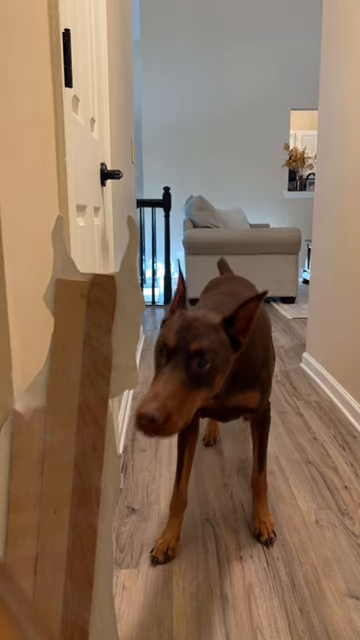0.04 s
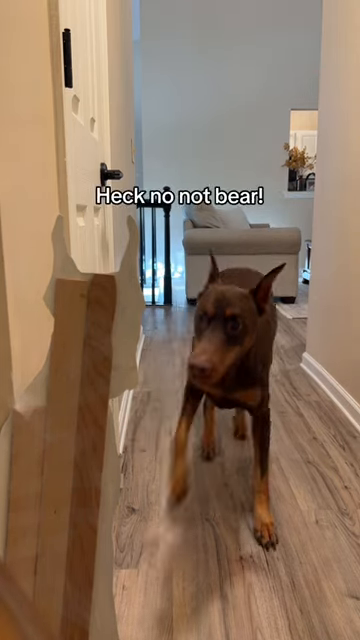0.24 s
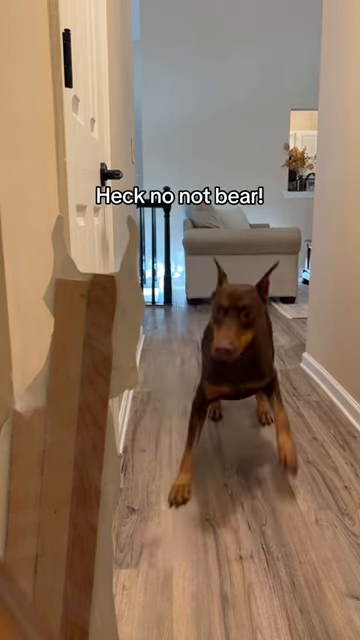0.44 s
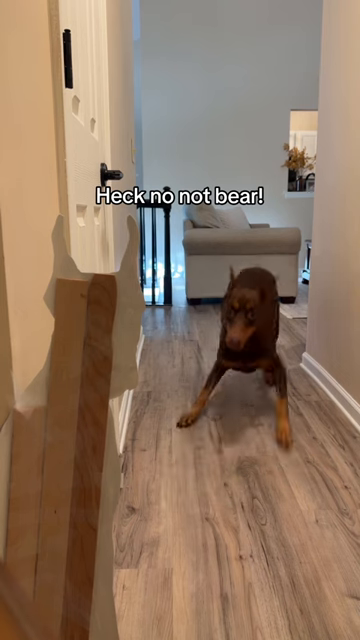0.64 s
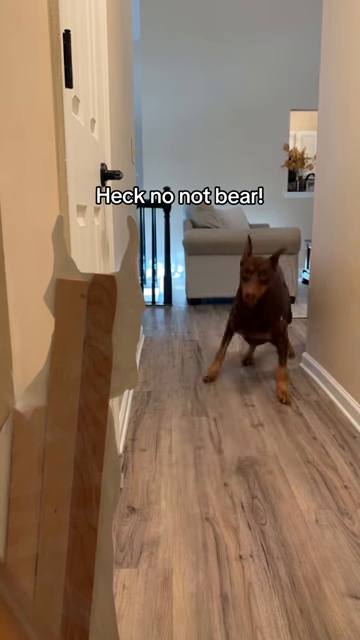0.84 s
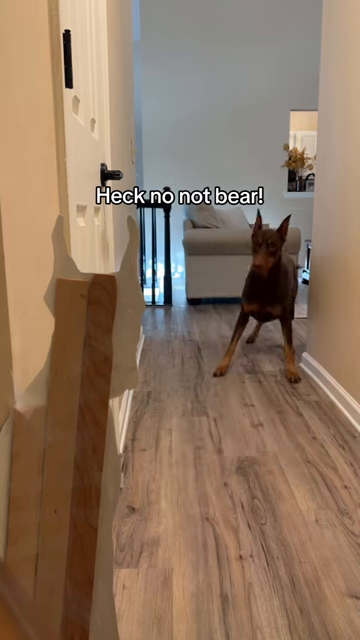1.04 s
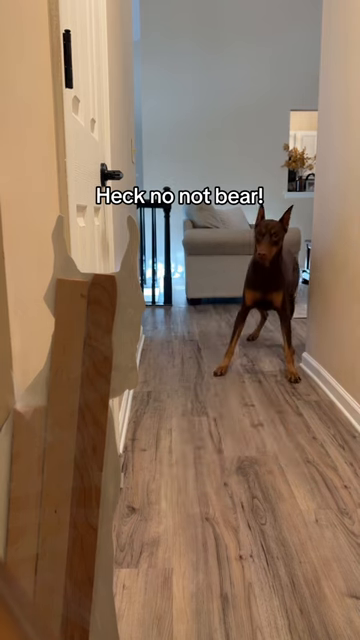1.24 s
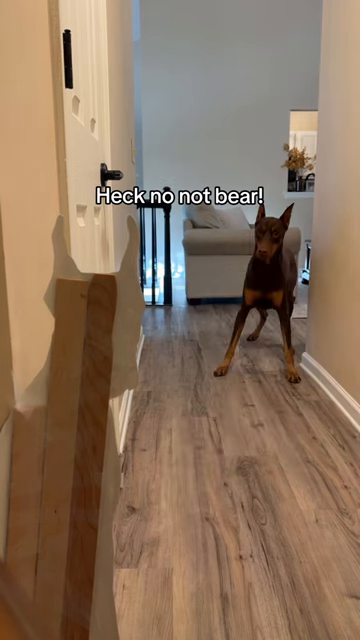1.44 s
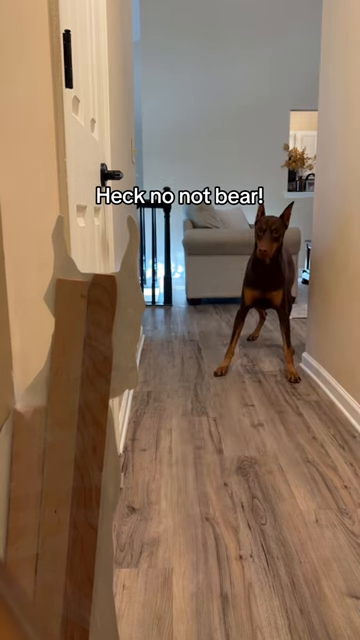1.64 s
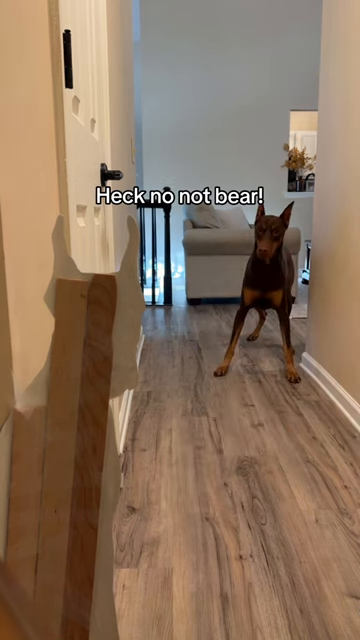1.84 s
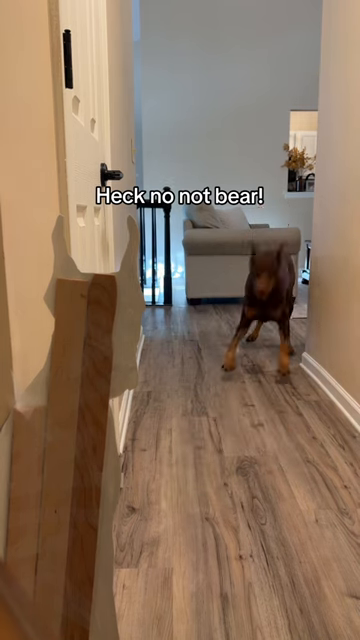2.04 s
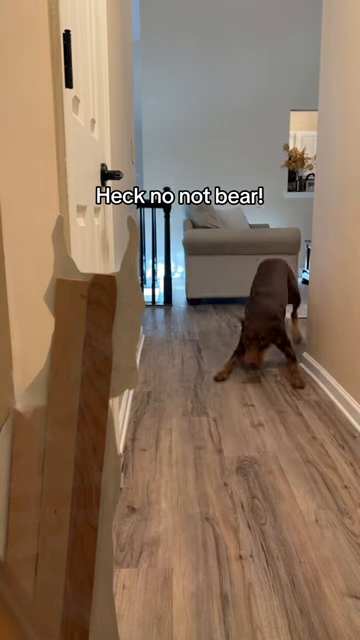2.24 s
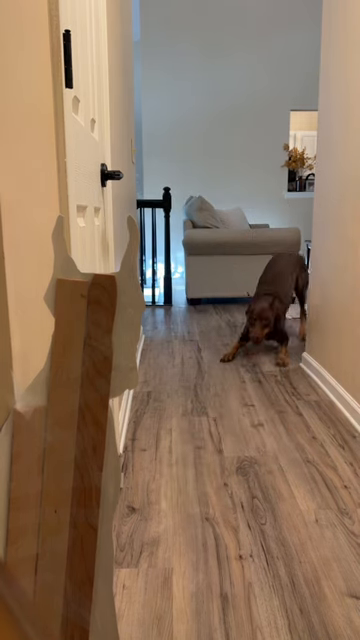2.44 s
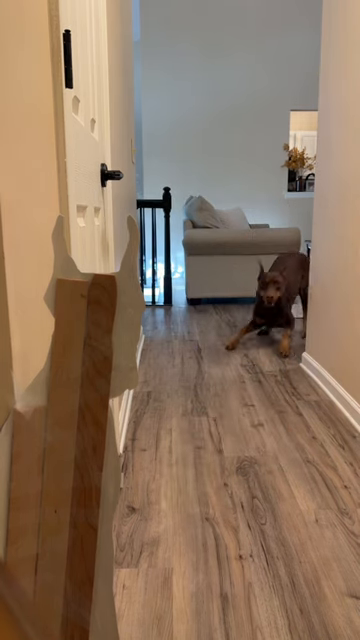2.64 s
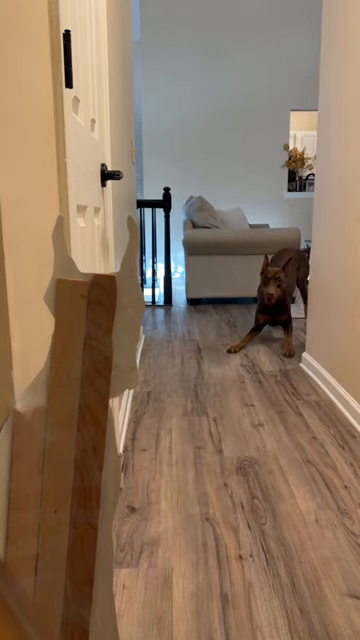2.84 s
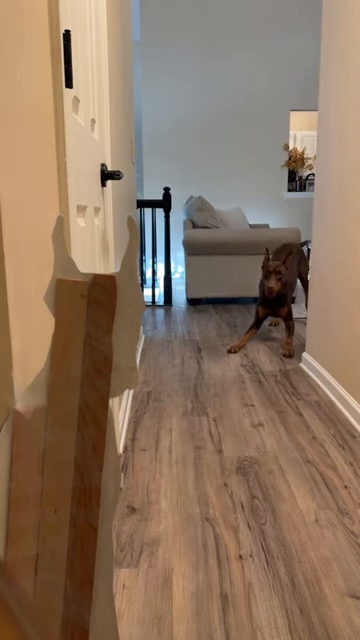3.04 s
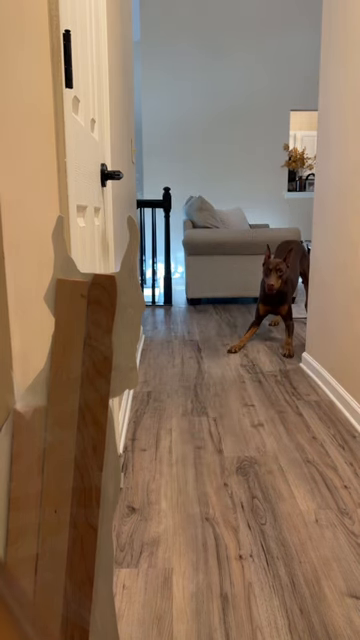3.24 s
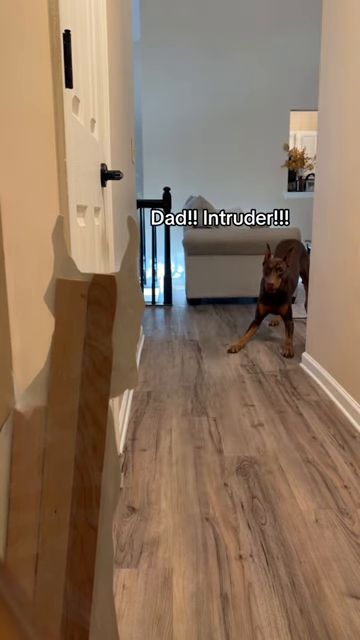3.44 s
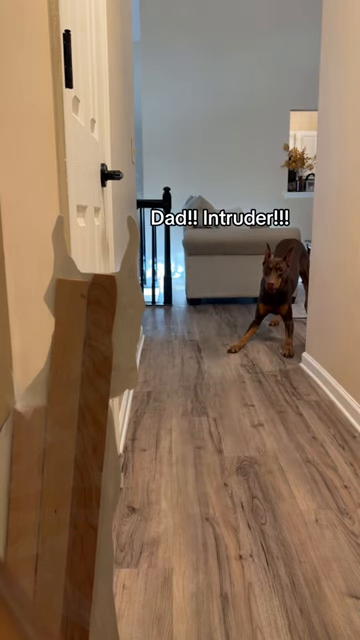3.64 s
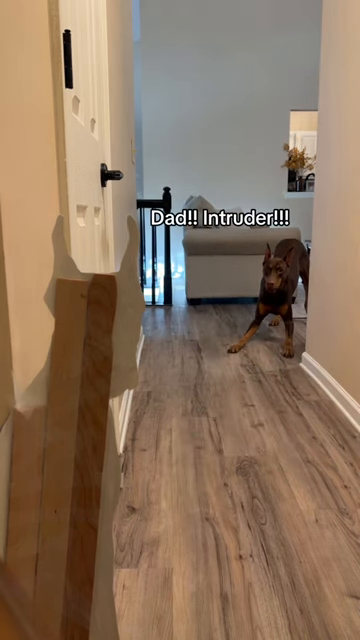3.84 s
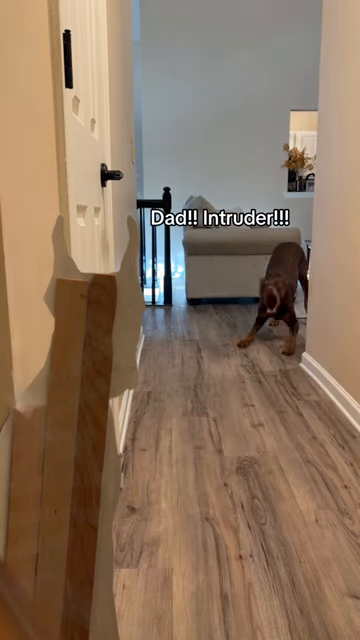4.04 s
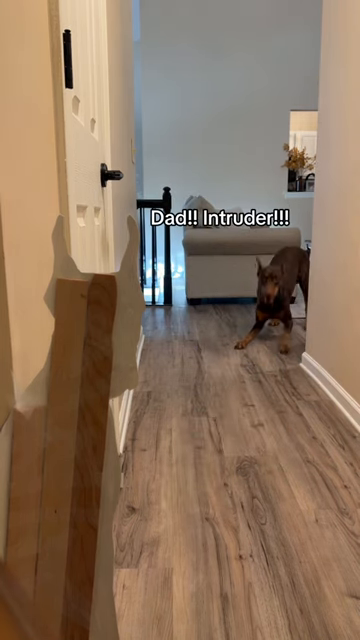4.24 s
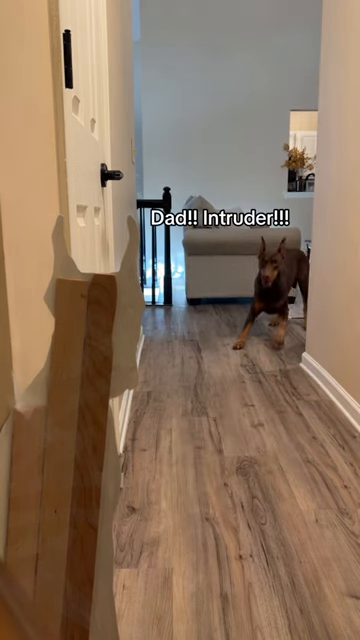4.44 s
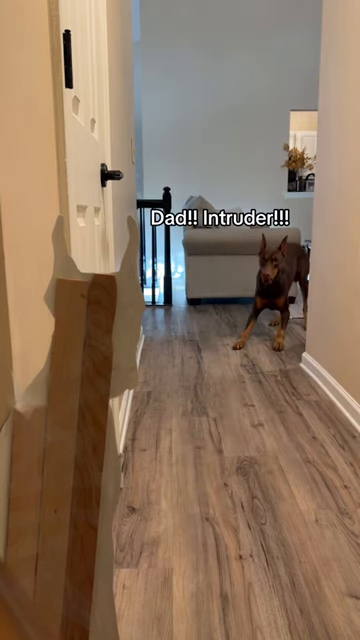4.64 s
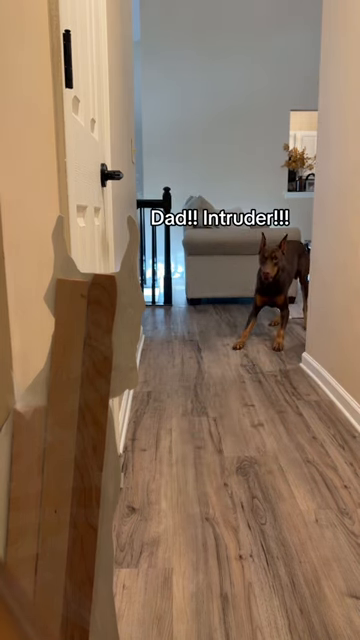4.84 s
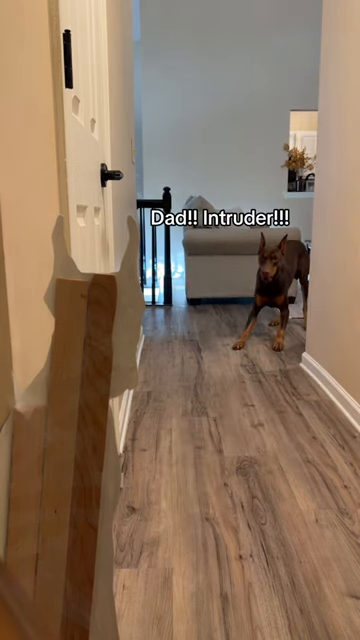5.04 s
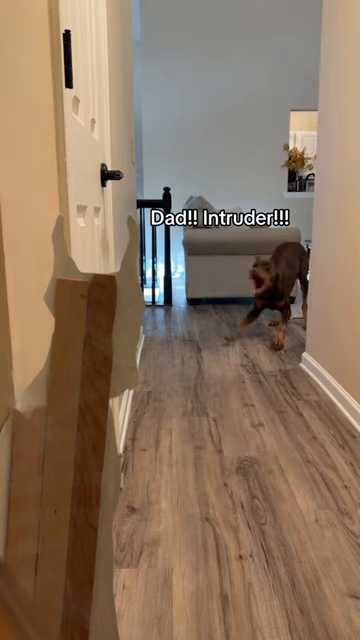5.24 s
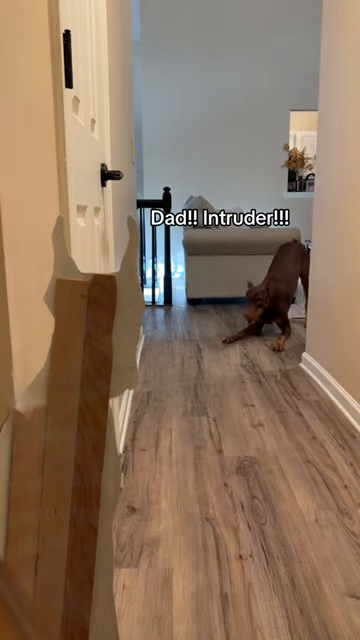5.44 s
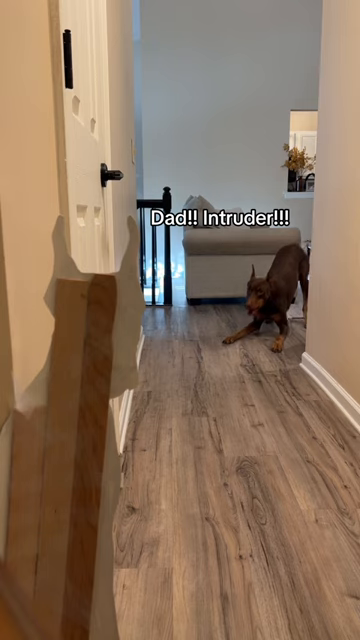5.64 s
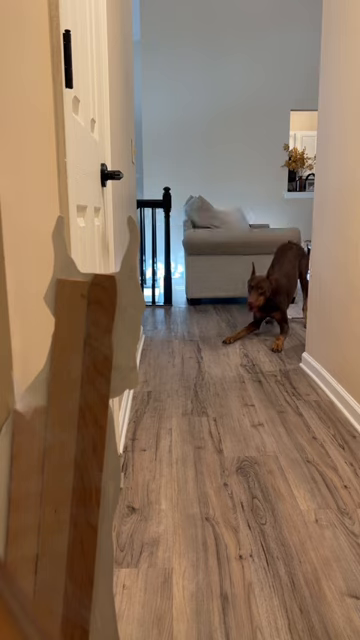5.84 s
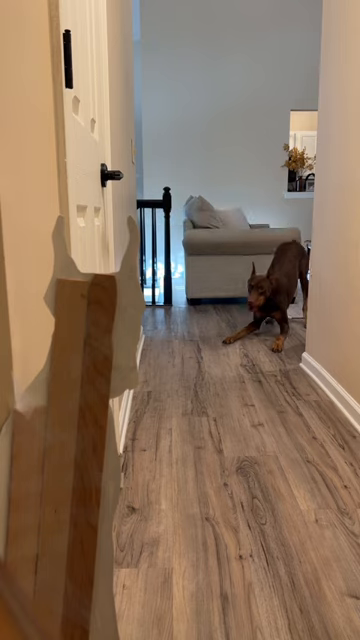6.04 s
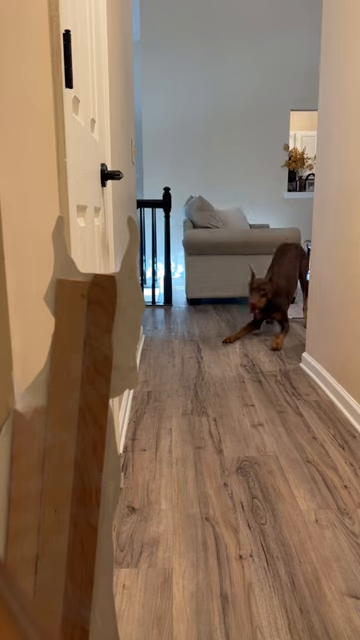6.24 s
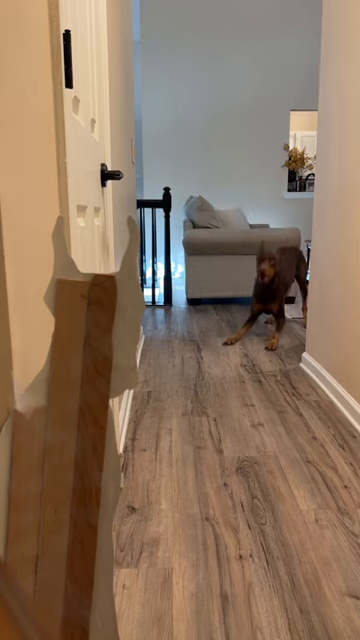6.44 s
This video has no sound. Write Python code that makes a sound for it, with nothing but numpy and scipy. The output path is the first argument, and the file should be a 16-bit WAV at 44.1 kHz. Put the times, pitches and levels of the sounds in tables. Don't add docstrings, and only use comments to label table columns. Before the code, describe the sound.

Noisy claw clatter and paw thumps on laminate give way to four single hoarse-to-high dog barks echoing down a home hallway.

```python
import sys
import numpy as np
from scipy import signal
from scipy.fft import rfft, irfft, next_fast_len
from scipy.io import wavfile
from scipy.ndimage import uniform_filter1d, map_coordinates

SR = 44100
rng = np.random.default_rng(int(sys.argv[2]) if len(sys.argv) > 2 else 0)


def to_linear_factor(level_db):
    exponent = np.asarray(level_db, float) / 20
    return 10 ** exponent


def int16_out(signal):
    q = np.round(np.clip(np.atleast_2d(signal).T, -1, 1) * 32767)
    wavfile.write(sys.argv[1], SR, q.astype(np.int16))


N = 286853
CALL_SAMPLES = SR // 4

# time in seconds, pitch in Hz, effort in dB.
BARK_TRACKS = [
    [(2.03, 176, -60.5), (2.05, 178.8, -20.5), (2.076, 203, -20.5), (2.086, 359.8, -21.5),
     (2.105, 376.4, -17), (2.128, 384, -16.5), (2.16, 390.4, -28), (2.19, 383, -56.5)],
    [(3.965, 189.2, -64.5), (3.998, 185.1, -24), (4.034, 243.9, -20.5), (4.042, 352, -20.5),
     (4.065, 366.6, -19.5), (4.088, 379.8, -17.5), (4.14, 370.7, -29.5), (4.175, 354, -48.5)],
    [(5.155, 197.5, -68.5), (5.197, 206.7, -23), (5.222, 238.5, -19.5), (5.243, 268.1, -22.5),
     (5.249, 361.8, -22.5), (5.275, 366.9, -22), (5.315, 370.1, -29), (5.345, 367, -44.5)],
    [(6.215, 188.8, -81), (6.252, 187.1, -34.5), (6.27, 237.1, -24.5), (6.292, 304.6, -20.5),
     (6.302, 351.7, -21.5), (6.33, 360, -19), (6.36, 364, -30), (6.39, 355.3, -44.5)],
]
# strength under 300 Hz in dB, mouth resonance with jaw shut in Hz, with jaw open
# in Hz, its level shut in dB, its level open in dB.
MUZZLES = [(1.5, 1150, 1200, -10.5, 1), (-11.5, 930, 1212, -8, 2), (-11.5, 895, 1329, -4.5, 3.5),
           (-7, 1000, 1400, 5, -4)]
# diffuse tail in dB, its delay in seconds.
BARK_TAILS = [(-10, .0072), (-8, .0068), (-7.5, 0.0059), (-6.5, .0075)]
# frequency in Hz, level in dB per Hz.
BREATH_SPECTRUM = [(1180, -23.5), (2000, -6.5), (2140, -3.5), (2330, -19), (2630, -17.5), (3880, -15.5),
                   (6060, -1), (10300, -27), (15600, -31)]
# time in seconds, level in dB.
HUFF_ENVELOPE = [
    (2.54, -52),
    (2.57, -34),
    (2.62, -35.5),
    (2.74, -48.5),
]
# centre in Hz, width in Hz, level in dB.
NOSE_MODES = [(550, 560, -12), (1260, 140, 2.5), (2071, 68, -2), (3700, 1300, -18)]
# frequency in Hz, T60 in seconds.
HALL_DECAY = [(100, 0.13), (300, 0.29), (750, 0.49), (1100, 0.53), (1500, 0.53), (2500, 0.44), (6000, 0.41),
              (12000, 0.36)]
# delay in seconds, level in dB.
WALL_ECHOES = [(.004, -12.5), (.009, -10.5), (.013, -14.5), (.021, -15.5), (.029, -18.5), (.043, -11)]
# frequency in Hz, T60 in seconds, level in dB.
HALL_MODES = [(504.5, .3, -56), (740, 0.5, -66.5), (1440, 0.8, -67), (1500, 0.55, -69), (1544, 0.98, -66),
              (4430, 0.44, -59)]
# time in seconds, peak in dB, share under 1.5 kHz in dB, share around 5.7 kHz in dB.
CLAW_STRIKES = [(0.084, -34, -10.5, 1.5), (0.192, -23.5, -14, -30), (0.2368, -18, -23, -30),
                (0.304, -13, -2, -24.5), (0.3314, -16, 0.5, -24.5), (0.35, -13, -16, -14),
                (0.448, -4, -12, -8.5), (0.578, -15, -14, -27), (0.6755, -9.5, -21, -36),
                (0.9554, -17, -19, -31), (1.9782, -48, -7, -40), (2.099, -23.5, -3, -29.5),
                (2.2508, -36.5, -8.5, -26), (2.429, -37, -3.5, -29), (2.7324, -36.5, -16.5, -24),
                (2.766, -22, -11, -4), (2.8459, -21.5, -15, -43), (4.2805, -52, 5, -27),
                (4.3978, -50, 7, -33), (4.4812, -54, -3.5, -25)]
# start in seconds, length in seconds, first level in dB, last level in dB, low part in dB.
PAD_SLIDES = [(0.099, 0.17, -50.5, -36, -14.5), (.298, 0.13, -17, -41, 4), (.444, 0.13, -26.5, -39.5, 1.5),
              (0.568, 0.05, -24, -43, -12.5), (.66, 0.05, -18, -30, 0), (.72, .16, -36, -30, -4.5),
              (.948, 0.055, -22.5, -43.5, 10.5), (1.97, 0.14, -49.5, -44.5, -0.8),
              (2.088, 0.07, -28, -61, -3), (2.248, .06, -44, -58.5, 12), (2.31, 0.23, -64.5, -59, 22.5),
              (2.42, 0.14, -45, -57, 2.5), (2.57, 0.17, -45, -50, 5.5), (2.715, 0.04, -31, -31.5, -1),
              (2.877, 0.113, -49, -54.5, -1)]
# time in seconds, peak in dB, board frequency in Hz.
PAW_LANDINGS = [(0.089, -53, 77.6), (0.191, -43.5, 140), (0.309, -30, 186), (0.35, -23.5, 85.5),
                (0.458, -31, 260.7), (0.58, -41, 260), (0.67, -32.5, 278), (0.71, -40, 80.3),
                (0.955, -61, 114), (2.468, -41, 104), (2.49, -37.5, 85), (2.521, -60, 75),
                (2.705, -44, 249), (2.772, -48, 172), (4.481, -49.5, 140), (4.519, -64, 62)]
# time in seconds, peak in dB, board frequency in Hz.
BARK_JOLTS = [
    (2.108, -33.5, 145),
    (2.152, -53.5, 76),
    (4.002, -33.5, 147),
    (5.281, -42, 78),
    (6.281, -48, 71.5),
]
# frequency in Hz, level in dB per Hz.
LAMINATE_SPECTRUM = [(880, -15), (1500, -2.5), (2420, -4), (2980, -2), (5470, -5), (6990, -2.5),
                     (7940, -5.5), (10200, -25.5), (14900, -36), (15600, -41)]
# frequency in Hz, level in dB per Hz.
HOUSE_SPECTRUM = [(12, -40.5), (20, -14), (68, 4), (113, -9.5), (220, -2.5), (363, -6.5), (406, -11),
                  (536, -7), (670, -5.5), (792, -5), (885, -2), (1460, -7.5), (3980, -14), (6770, -23.5),
                  (15600, -59)]
# centre in Hz, width in Hz, level in dB.
APPLIANCE_DRONES = [(411, 30, -59.5), (497, 24, -63), (669.2, 87, -56), (904, 10, -66)]
# time in seconds, gain in dB.
PHONE_GAIN = [
    (0, 4.5),
    (2.14, 2.7),
    (2.28, -23),
    (2.5, 2),
    (4.02, 2.9),
    (4.2, -14.5),
    (4.5, -14.5),
    (4.9, -14),
    (6.5, -18.5),
]
# time in seconds, wash in dB, shake in dB.
HOUSE_ANSWERS = [
    (.4, -44, -32),
    (.58, -66, -72),
    (1.05, -58.5, -86),
    (2.15, -59.5, -57),
    (2.68, -59.5, -59.5),
    (2.8, -55, -55.5),
    (4.22, -52.5, -81),
    (5.36, -51, -83.5),
    (6.43, -47.5, -72),
]


def unit(x):
    return x / np.sqrt(np.mean(x ** 2) + 1e-20)


def along(points, hz):
    f, v = np.transpose(points)
    return np.interp(np.log(hz + 1), np.log(f + 1), v)


def curves(rows, t):
    s, *columns = np.transpose(rows)
    return [np.interp(t, s, column) for column in columns]


def add_at(out, start_s, x):
    out[round(start_s * SR):][:len(x)] += x


def wobble(knots_per_s, size=N):
    knots = rng.standard_normal(int(size * knots_per_s / SR) + 4)
    return map_coordinates(knots, [np.arange(size) * knots_per_s / SR])


def filtered(x, response):
    m = next_fast_len(len(x) + SR // 2)
    return irfft(rfft(x, m) * response(np.fft.rfftfreq(m, 1 / SR)), m)[:len(x)]


def peak(f, hz, width_hz):
    return 1j * f * width_hz / (hz * hz - f * f + 1j * f * width_hz)


def hiss(response, size=N):
    return unit(filtered(rng.standard_normal(size), response))


def patchy(x, patchy_db):
    z = signal.stft(x, nperseg=256)[2]
    field = uniform_filter1d(rng.standard_normal(z.shape), 5, 0)
    field = uniform_filter1d(field, 14, 1)
    return unit(signal.istft(z * to_linear_factor(patchy_db * unit(field)), nperseg=256)[1][:len(x)])


def bark(rows, bass_db, shut_hz, open_hz, shut_db, open_db):
    t = rows[0][0] + np.arange(CALL_SAMPLES) / SR
    pitch_hz, effort_db = curves(rows, t)
    jaw = np.clip((pitch_hz - 255) / (320 - 255), 0, 1)

    def follow(shut, wide):
        return shut + (wide - shut) * jaw

    chest_db = follow(-2, -5.5) + 0.21 * bass_db
    throat_hz, mouth_hz = follow(545, 745), follow(shut_hz, open_hz)
    mouth_db, lip_db, edge_db = follow(shut_db, open_db), follow(-16, -12.5), follow(-14, -0.5)

    break_samples = SR // 40
    jaw_speed = np.abs(np.gradient(jaw)) * break_samples
    breaking = uniform_filter1d(jaw_speed, break_samples, origin=break_samples // 3)
    rough = np.clip(follow(0.125, 0.065) + 0.15 * breaking, 0, .3)
    jitter = 1 + 0.0057 * rough * wobble(120, CALL_SAMPLES)
    phase = 2 * np.pi * np.cumsum(pitch_hz * jitter) / SR

    voice = np.zeros(CALL_SAMPLES)
    for k in range(1, 30):
        f = k * pitch_hz
        tract = to_linear_factor(chest_db) * np.abs(peak(f, 345, 230)) ** 2
        tract += np.abs(peak(f, throat_hz, 310)) ** 1.7
        tract += to_linear_factor(mouth_db) * np.abs(peak(f, mouth_hz, 320)) ** 3
        tract += to_linear_factor(lip_db) * np.abs(peak(f, 1565, 700)) ** 11.0
        tract += to_linear_factor(edge_db - 43.5) * np.abs(peak(f, 2900, 900)) ** 2
        tract += to_linear_factor(edge_db - 35.5) * np.abs(peak(f, 4400, 700)) ** 2
        smear = wobble(220, CALL_SAMPLES) + 1j * wobble(220, CALL_SAMPLES)
        turn = np.exp(1j * (k * phase + rng.uniform(0, 2 * np.pi)))
        voice += tract * np.real((np.sqrt(1 - rough) + np.sqrt(rough) * smear) * turn)

    def bass(f):
        shelf = 1 + (to_linear_factor(bass_db) - 1) / (1 + (f / 275) ** 10)
        return shelf - .8 * np.abs(peak(f, 270, 70)) ** 2

    def teeth(f):
        muzzle = .4 + np.abs(peak(f, 2900, 500)) ** 2 + np.abs(peak(f, 4400, 450)) ** 2
        return to_linear_factor(along(BREATH_SPECTRUM, f)) * muzzle

    voice = filtered(voice, bass)
    rasp = hiss(lambda f: peak(f, 1800, 550) ** 3 + .6 * peak(f, 950, 600) ** 3, CALL_SAMPLES)
    voice += to_linear_factor(-9) * np.sqrt(rough) * rasp
    puffs = (1 + 0.52 * np.cos(phase)) * to_linear_factor(0.9 * wobble(150, CALL_SAMPLES))
    breath = to_linear_factor(-22.5) * follow(.35, 1) * puffs * patchy(hiss(teeth, CALL_SAMPLES), patchy_db=4.0)
    return to_linear_factor(effort_db) * (t < rows[-1][0]) * (1.122 * voice + breath)


def huff():
    t = HUFF_ENVELOPE[0][0] + np.arange(CALL_SAMPLES) / SR

    def nose(drop):
        def response(f):
            total = 0
            for k, (hz, width_hz, db) in enumerate(NOSE_MODES):
                total = total + (-1) ** k * to_linear_factor(db) * peak(f, hz * drop ** (k % 2), width_hz)
            return total / (1 + (f / 7000) ** 4)
        return hiss(response, CALL_SAMPLES)

    relaxed = np.clip((t - HUFF_ENVELOPE[1][0]) / 0.22, 0, 1)
    air = np.sqrt(1 - relaxed) * nose(0.95) + np.sqrt(relaxed) * nose(0.862)
    level_db = curves(HUFF_ENVELOPE, t)[0] - 1.5 + 3.2 * wobble(70, CALL_SAMPLES)
    return to_linear_factor(level_db) * air * np.clip((HUFF_ENVELOPE[-1][0] - t) / 0.01, 0, 1)


def hall(x, wet_db, gap_s=0.0074):
    hz, t, z = signal.stft(rng.standard_normal(SR * 3 // 2), SR, nperseg=256)
    fall_db = -60 * t / along(HALL_DECAY, hz)[:, None]
    decay = to_linear_factor(3.3 * fall_db) + to_linear_factor(10.5 + 0.74 * fall_db)
    tail = signal.istft(z * decay, SR, nperseg=256)[1]
    tail = np.pad(tail * to_linear_factor(wet_db) / np.linalg.norm(tail), (round(gap_s * SR), 0))
    u = np.arange(len(tail)) / SR
    for mode_hz, t60_s, db in HALL_MODES:
        tail += to_linear_factor(db - 60 * u / t60_s) * np.sin(2 * np.pi * mode_hz * u)
    tail[0] = 1
    for delay_s, db in WALL_ECHOES:
        tail[round(delay_s * SR)] += to_linear_factor(db) * rng.choice([-1, 1])
    return signal.fftconvolve(x, tail)


def dog():
    out = np.zeros(N + 2 * SR)
    for rows, muzzle, (wet_db, gap_s) in zip(BARK_TRACKS, MUZZLES, BARK_TAILS):
        add_at(out, rows[0][0], hall(bark(rows, *muzzle), wet_db, gap_s))
    add_at(out, HUFF_ENVELOPE[0][0], hall(huff(), wet_db=-6.5))
    return out[:N]


def claws_and_pads():
    u = np.arange(SR // 2) / SR
    high, low, tips = np.zeros((3, N + SR))
    for s, db, low_db, tip_db in CLAW_STRIKES:
        burst = (1 - np.exp(-u / 0.00053)) * (to_linear_factor(-60 * u / 0.33) + to_linear_factor(-10.5 - 60 * u / 0.23))
        add_at(high, s, to_linear_factor(db - 18.5) * burst)
        add_at(low, s, to_linear_factor(db + low_db - 15.5) * burst)
        add_at(tips, s, to_linear_factor(db + tip_db - 15.5) * burst)
    grip_s, lift_db_per_s = 0.024, 148
    for s, length_s, first_db, last_db, low_db in PAD_SLIDES:
        skid_db = np.interp(u, [0, length_s], [first_db, last_db])
        skid_db -= lift_db_per_s * np.maximum(u - length_s, 0)
        skid = to_linear_factor(skid_db) * np.minimum(u / grip_s, 1)
        add_at(high, s, to_linear_factor(-4) * skid)
        add_at(low, s, to_linear_factor(low_db - 16.0) * skid)
    grain = to_linear_factor(1.2 * wobble(250) + .5 * wobble(45))
    scratch = grain * hiss(lambda f: to_linear_factor(along(LAMINATE_SPECTRUM, f)))
    knock = grain * hiss(lambda f: peak(f, 1000, 400) + 0.37 * peak(f, 450, 400))
    click = grain * hiss(lambda f: peak(f, 5700, 3000) ** 2 + .15 * peak(f, 13000, 5000) ** 2)
    out = high[:N] * patchy(scratch, patchy_db=1.4)
    out += low[:N] * patchy(knock, patchy_db=-5.0)
    return out + tips[:N] * unit(click)


def floor_boards():
    u = np.arange(SR // 2) / SR
    boards = np.zeros(N + SR)
    for s, db, hz in [*PAW_LANDINGS, *BARK_JOLTS]:
        ring = 0.68 * np.sin(2 * np.pi * hz * u)
        ring += 0.75 * hiss(lambda f: peak(f, hz, 0.97 * hz) / (1 + (f / 700) ** 2), len(u))
        add_at(boards, s, to_linear_factor(db - 60 * u / 0.23) * (1 - np.exp(-u / 0.0033)) * ring)
    return boards[:N]


def house():
    t = np.arange(N) / SR
    gain_db, = curves(PHONE_GAIN, t)
    s, wash_db, shake_db = np.transpose(HOUSE_ANSWERS)[..., None]
    swell_db_per_s, fade_db_per_s = 152, 113
    hump = to_linear_factor(-np.maximum(swell_db_per_s * (s - t), fade_db_per_s * (t - s)))

    def lows(f):
        return 1 / (1 + (f / 300) ** 4)

    air = to_linear_factor(.8 * wobble(5.7)) * hiss(lambda f: to_linear_factor(along(HOUSE_SPECTRUM, f)) * (1 - lows(f)))
    for hz, width_hz, db in APPLIANCE_DRONES:
        air += to_linear_factor(db + 51.5) * hiss(lambda f: peak(f, hz, width_hz) ** 2)
    rumble = hiss(lambda f: to_linear_factor(along(HOUSE_SPECTRUM, f)) * lows(f))
    rumble *= to_linear_factor(-2.5 + 2.2 * wobble(7))
    air_level = to_linear_factor(-59 + gain_db) + (to_linear_factor(wash_db) * hump).sum(axis=0)
    rumble_level = to_linear_factor(-58.5 + gain_db) + (to_linear_factor(shake_db) * hump).sum(axis=0)
    return air_level * air + rumble_level * rumble


def scene():
    return (dog() + claws_and_pads() + floor_boards() + house())[None]


def low_pass(x):
    return signal.sosfilt(signal.butter(12, 15760, fs=SR, output="sos"), x)


def record(dry):
    rounded = dry / (1 + np.abs(dry / .56) ** 4) ** .25
    return low_pass(rounded)


dry = scene()
out = record(dry)
int16_out(out)
```